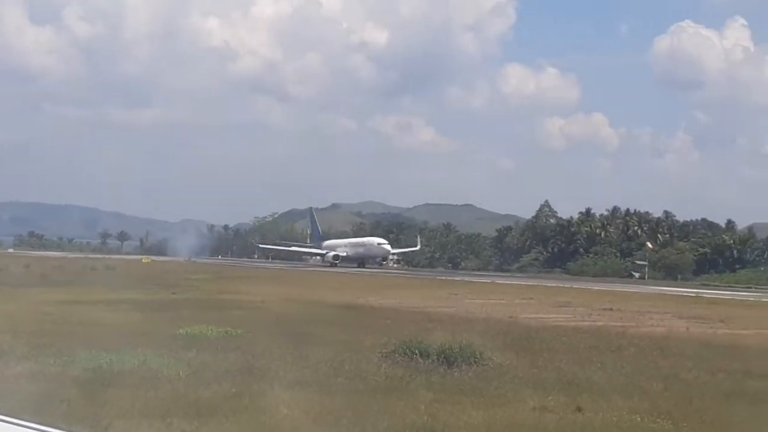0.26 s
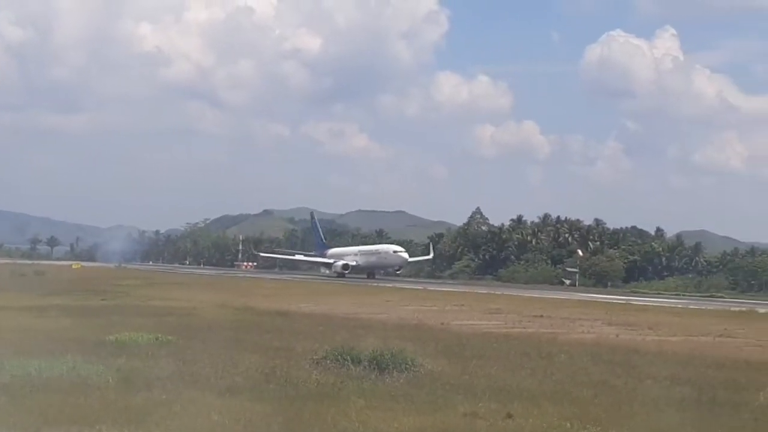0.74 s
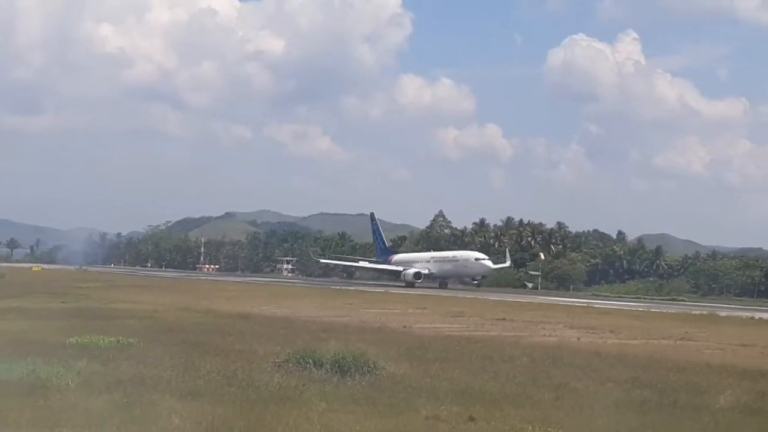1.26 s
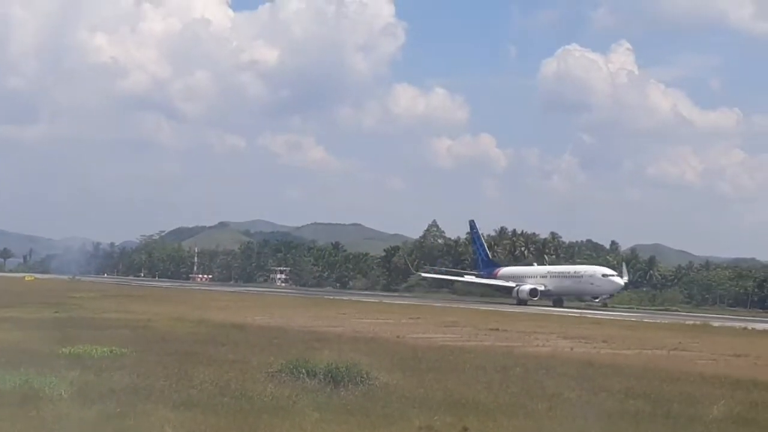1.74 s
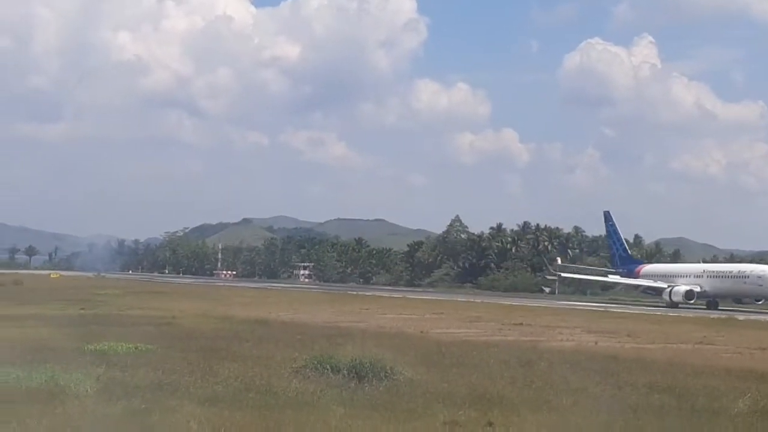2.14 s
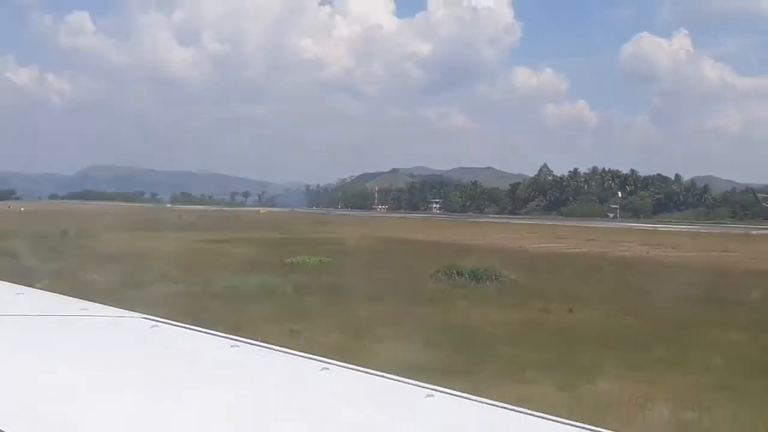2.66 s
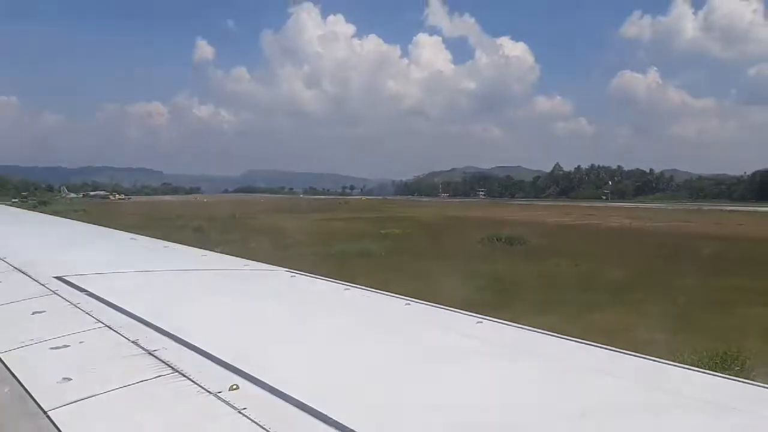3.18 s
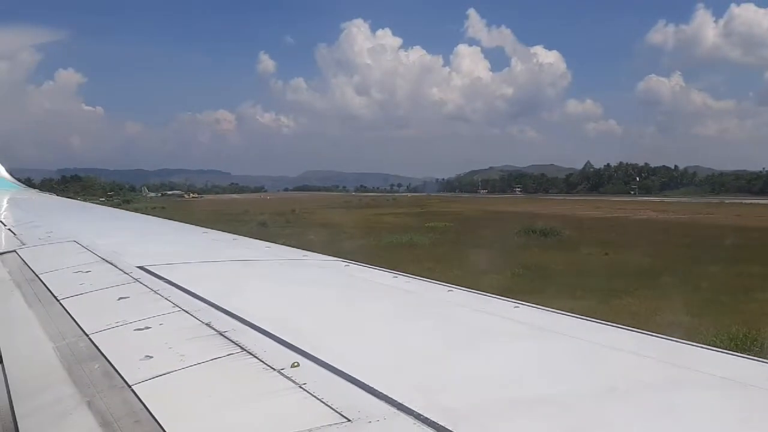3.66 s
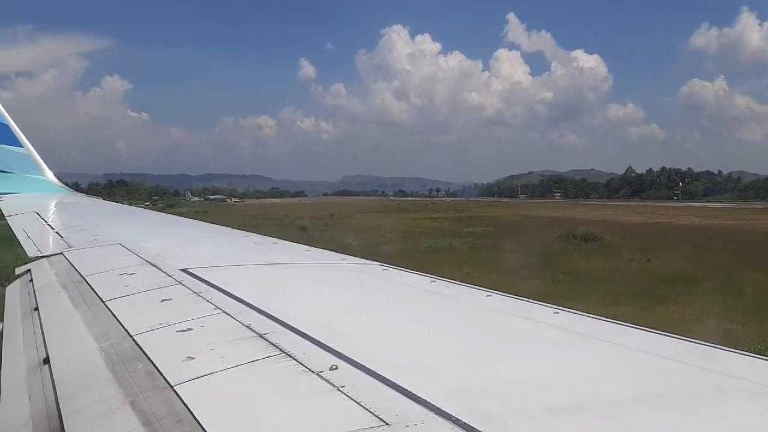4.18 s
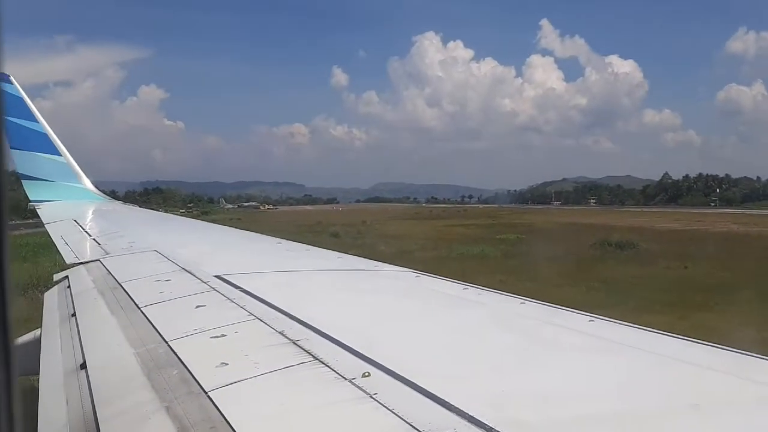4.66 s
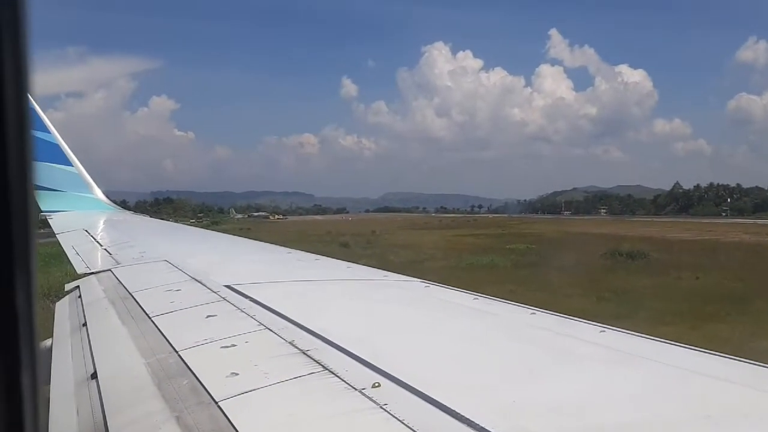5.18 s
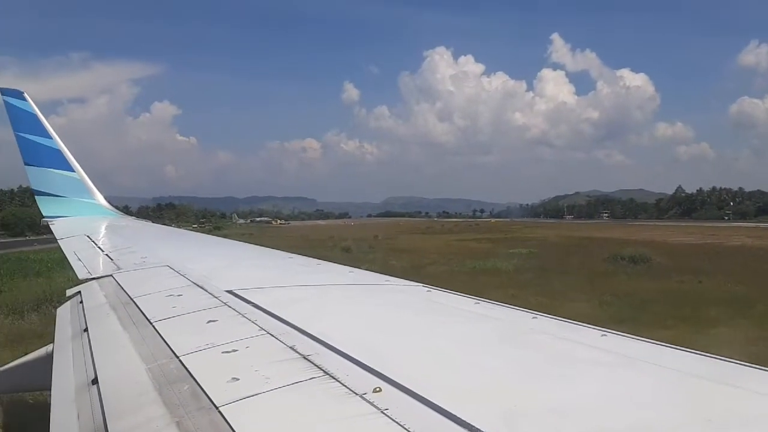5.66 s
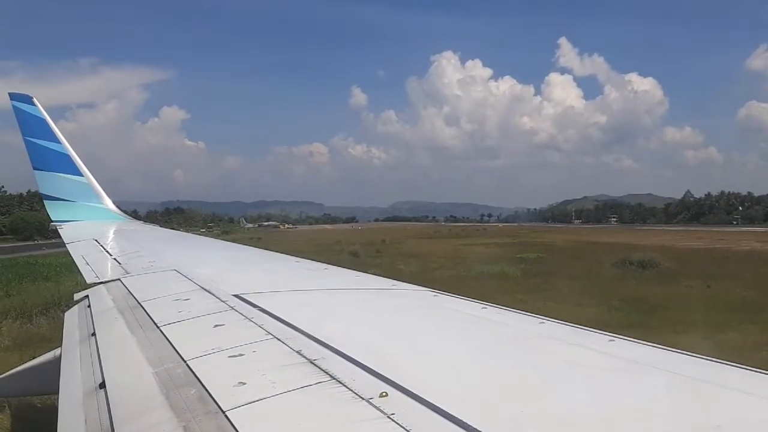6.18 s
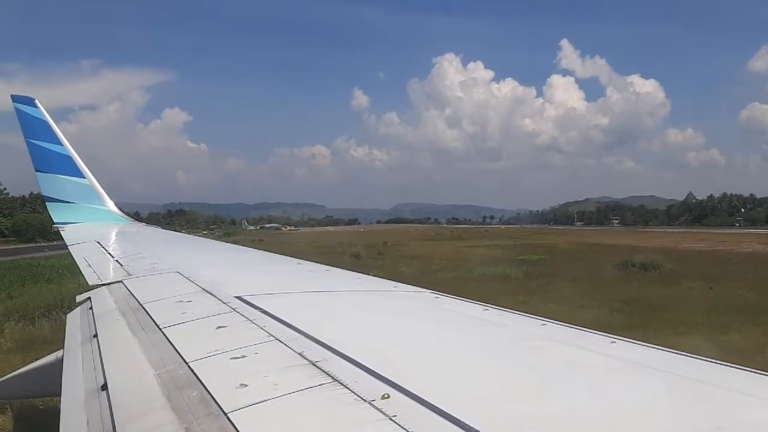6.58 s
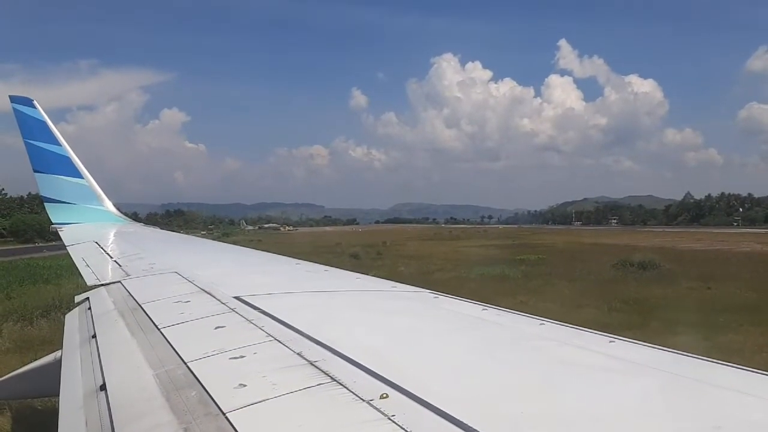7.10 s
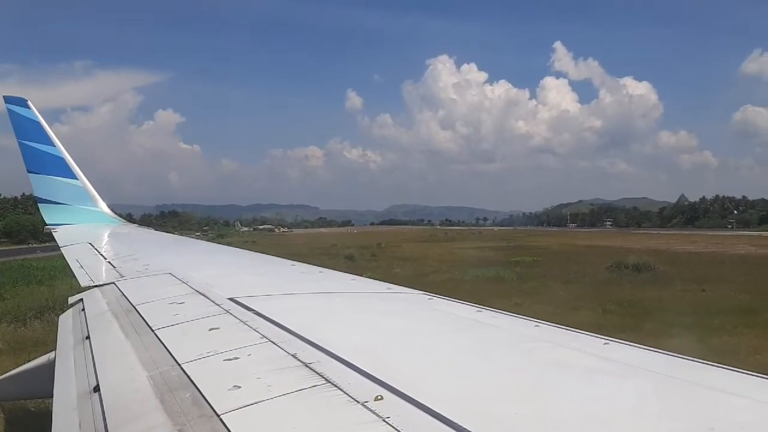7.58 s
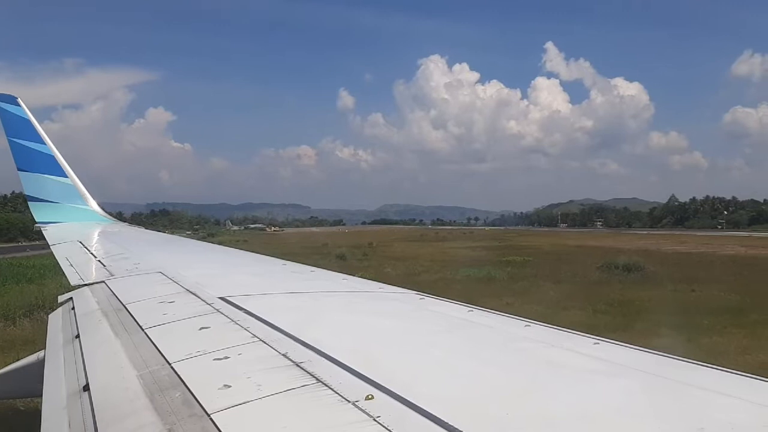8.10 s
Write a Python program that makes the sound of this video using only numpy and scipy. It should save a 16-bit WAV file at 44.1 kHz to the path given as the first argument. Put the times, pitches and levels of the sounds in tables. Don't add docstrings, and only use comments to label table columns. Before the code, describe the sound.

A window-seat cabin hum: idling engines rumble through the wall with steady tonal buzz, slow beating, faint fan whine and muted air hiss. A passing jet adds a smooth, dull low roar that rises and recedes without a sharp whoosh. Occasional dry handling clicks come from the handheld device. After seven and a half seconds, a hard cut brings overwhelming, slightly saturated low engine roar until the abrupt end.

```python
import sys
import numpy as np
from scipy import signal
from scipy.fft import rfft, irfft, next_fast_len
from scipy.io import wavfile
from scipy.ndimage import uniform_filter1d

SR = 44100
rng = np.random.default_rng(int(sys.argv[2]) if len(sys.argv) > 2 else 0)


def master(y):
    cut = np.clip(np.atleast_2d(y).T, -1, 1)
    pcm = np.round(cut * 32767)
    wavfile.write(sys.argv[1], SR, pcm.astype(np.int16))


def attenuation_scalar(level_db):
    decades = np.asarray(level_db, float) / 20
    return 10 ** decades


N = 367773

# freq_hz, density_db_per_hz
THRUST_MID = [(15, -62), (25, -27), (119, -3), (213, -8.5), (326, -11.5), (892, -41), (1260, -43.5),
              (1400, -44), (1870, -45), (2140, -47), (2640, -47.5), (5400, -54.5), (11600, -67.5),
              (12900, -67), (14000, -115)]
THRUST_SIDE = [(15, -59), (25, -29), (104, -8.5), (219, -5), (485, -12.5), (666, -16), (1050, -23.5),
               (1560, -23.5), (2940, -31), (5400, -35.5), (11000, -50), (12900, -54), (14000, -102)]
# freq_hz, density_db_per_hz
IDLE_MID = [(15, -80), (25, -37.5), (80, -7), (119, -3.5), (140, -4.5), (164, -2), (177, -9.5), (208, -4),
            (250, -8), (344, -7), (485, -22), (1400, -35), (4370, -44.5), (12300, -57.5), (14000, -86)]
IDLE_SIDE = [(15, -67), (25, -49), (122, -10), (147, -6.5), (309, -12.5), (344, -2), (525, -14.5),
             (684, -14), (1020, -16), (1100, -18.5), (2860, -27), (12600, -42), (14000, -76)]
# freq_hz, left_minus_right_db
THRUST_BALANCE = [(60, -1), (110, 1), (200, 2.5), (370, 2), (670, 3.5), (1230, 0.0), (2260, -0.5),
                  (4130, -5), (7560, -8.5), (13800, -7)]
IDLE_BALANCE = [(60, 2), (110, -0.5), (200, -0.5), (370, 1.5), (670, 2.5), (1230, 0), (2260, -4),
                (4130, -3), (7560, 1), (13800, -3)]
# freq_hz, width_hz,
# lift_db
THRUST_PANELS = [(131.8, 18, 7), (216, 24, 3), (278, 18, 0), (508, 88, -5.5), (677, 45, 4),
                 (3800, 500, 3.5), (7730, 440, 5.5), (11500, 500, 7.5)]
IDLE_PANELS = [(94.3, 11, 3.5), (341, 29, 0.5), (453.6, 27, 5), (686.5, 30, 8), (708, 26, -2),
               (1111, 320, -5), (1874, 36, -4), (2116, 250, 7.5), (2412, 130, 5.5), (2912, 100, 5),
               (3397, 130, 3.5), (4140, 500, 2.5), (6830, 670, 1), (7660, 300, 1.5), (11600, 990, 3)]
# centre_s, depth_db, half_length_s
LULLS = [
    (7.836, 17, 0.017),
    (7.972, 14, 0.026),
    (8.11, 5.5, .03),
    (8.261, 3.7, 0.043),
]
# multiple, left_db, right_db, left_lead_rad
BLADES = [(1, -54, -54, .5), (2, -60, -57, 1.)]
# multiple, left_db, right_db, left_lead_rad
SHAFT = [(1, -24, -25, -0.1), (2, -40, -43, 0.0), (3, -41, -47, -0.5), (4, -68, -53, -1.1),
         (5, -54, -57, -0.6)]
PUMP_PITCH_HZ = (346.55, 346.86)
# multiple, left_db, right_db, left_lead_rad
PUMP = [(1, -35, -38, -.3), (2, -50, -43, -2.1), (3, -44, -54, 2.2), (4, -65, -59, -2.0),
        (5, -56, -54, -1.1), (6, -61, -61, .8), (7, -59, -60, -.4), (8, -76, -63, 3.0), (9, -67, -66, .9)]
FAN_PITCH_HZ = (881.17, 885.28)
# multiple, left_db, right_db, left_lead_rad
FAN_A = [(1, -55, -62, -2.7), (2, -68, -61, -0.2), (3, -65, -58, 2.5), (4, -67, -63, -0.9),
         (5, -75, -69, 3.1)]
FAN_B = [(1, -52, -58, -0.8), (2, -68, -69, 0.3), (3, -61, -70, -0.7)]
# pitch_hz, left_db, right_db, left_lead_rad
GEARS = [(1348.1, -53, -54, -.1), (1366.8, -70, -59, 1.3), (4244.9, -66, -61, 2.6),
         (2188.6, -66, -65, -3.1)]
BLOWER_PITCH_HZ = (1440, 1452, 1465)
# multiple, left_db, right_db, left_lead_rad
BLOWER = [(1, -56, -52, 1.6), (2, -65, -60, -2.3)]
# freq_hz, density_db_per_hz
PASSING_COLOUR = [(30, -64), (60, -19), (95, -1), (140, -3), (220, 3.5), (260, -6), (330, -16.5),
                  (500, -15), (900, -51.5)]
# start_s, peak_db, centre_hz, length_s, top_end_db
CREAKS = [(0.481, -32.5, 5000, .016, -7), (.496, -38, 5500, 0.021, -9), (0.488, -38, 1900, 0.016, -30),
          (.485, -39.5, 4000, 0.025, -30), (4.8, -52, 6000, 0.095, 0), (1.55, -51, 5000, .03, -7),
          (4.55, -53, 6400, 0.22, -30), (4.799, -33, 5600, .008, -20), (4.81, -37, 5700, .007, -7),
          (5.791, -47, 6600, 0.028, -7), (5.792, -40, 4200, 0.017, -30), (6.25, -50, 6460, 0.01, -14),
          (7.76, -45, 6000, 0.021, -2)]
# edge_hz, gain_above_db
IDLE_SHELVES = [(4650, -3.5), (7200, -3.5), (8300, -3)]
THRUST_SHELVES = [(5750, -6), (8300, 2)]
# freq_hz, step_db
CAMERA_STEP = [(400, -20), (900, -3), (1300, 2), (2500, 4), (4500, 8.5), (7000, 8.5), (13000, 8.5)]

CUT_S, CUT_FADE_S = 7.5787, .000025
THRUST_DB, THRUST_SIDE_DB, IDLE_DB, IDLE_SIDE_DB = -8.5, -26.5, -21, -34
BOOM_SAG_DB_PER_S, RUMBLE_SAG_DB_PER_S = 4.5, 0.4
BLADE_HZ, SHAFT_HZ = 1842, 150.21
SHAFTS_IN_STEP_S, SHAFT_BEAT_S, SHAFT_BEAT_DEPTH = 3.9, 9, 0.49
PUMPS_IN_STEP_S = 1.55
PASSES_S, PASS_SPREAD_S, PASS_DB, EXHAUST_DB = 3.35, .55, -21.5, 1.5
WAKE_LATE_S, WAKE_SPREAD_S, WAKE_DB = 1.4, .8, 3.5
CREAK_HALF_WIDTH_HZ, CREAK_QUICK_S = 560, .006
CAMERA_TOP_HZ, FRAME_SAMPLES = 13100, 1024

T = np.arange(N) / SR
SIZE = next_fast_len(N)
HZ = np.maximum(np.arange(SIZE // 2 + 1) * SR / SIZE, 1.)


def level(x, db):
    return x * attenuation_scalar(db) / np.sqrt(np.mean(x ** 2))


def over_hz(rows):
    hz, value = np.transpose(rows)
    return np.interp(np.log(HZ), np.log(hz), value)


def walk(rate_hz):
    hold = int(SR / rate_hz)
    held = np.repeat(rng.standard_normal(N // hold + 1), hold)
    slewed = uniform_filter1d(uniform_filter1d(held, hold), hold)
    return 1.3 * slewed[:N]


def turbulence(colour, panels, db):
    gain = attenuation_scalar(over_hz(colour))
    for hz, width_hz, lift_db in panels:
        gain = gain * attenuation_scalar(lift_db / (1 + ((HZ - hz) / (width_hz / 2)) ** 2))
    noise = irfft(gain * rfft(rng.standard_normal(SIZE)), SIZE)
    return rfft(level(noise, db))


def cabin_noise(mid, side, balance, band_db, flicker_db):
    tilt = attenuation_scalar(over_hz(balance) / 2)
    pair = np.array([(mid + side) * tilt, (mid - side) / tilt])
    octave = np.clip(np.log2(HZ / 60), 0, 7)
    out = 0
    for k in range(8):
        share = np.clip(1 - abs(octave - k), 0, 1)
        band = irfft(pair * share, SIZE)[:, :N]
        out = out + band * attenuation_scalar(band_db(k) + flicker_db * walk(11))
    return out


def thrust():
    since_s = T - CUT_S
    lull_db = sum(db * np.exp(-((T - s) / half_s) ** 2) for s, db, half_s in LULLS)
    boom_db = 3.5 - BOOM_SAG_DB_PER_S * since_s - lull_db
    rumble_db = .3 - RUMBLE_SAG_DB_PER_S * since_s
    low_db = (boom_db, boom_db, rumble_db, 0.37 * rumble_db)

    def band_db(k):
        return low_db[k] if k < 4 else 0

    mid = turbulence(THRUST_MID, THRUST_PANELS, THRUST_DB)
    side = turbulence(THRUST_SIDE, THRUST_PANELS, THRUST_SIDE_DB)
    air = cabin_noise(mid, side, THRUST_BALANCE, band_db, 0.92)
    return air + tones(turning(BLADE_HZ, 0.001034, 6.6), BLADES)


def idle_air():
    rumble_db, hiss_db = -1.5 + 0.96 * walk(.9), .6
    wake_db = WAKE_DB * np.exp(-((T - PASSES_S - WAKE_LATE_S) / WAKE_SPREAD_S) ** 2)

    def band_db(k):
        return rumble_db + (k < 2) * wake_db if k < 3 else hiss_db

    lifts = [panel for panel in IDLE_PANELS if panel[2] > 0]
    mid = turbulence(IDLE_MID, IDLE_PANELS, IDLE_DB)
    side = turbulence(IDLE_SIDE, lifts, IDLE_SIDE_DB)
    return cabin_noise(mid, side, IDLE_BALANCE, band_db, 0.82)


def passing_db():
    along = (T - PASSES_S) / PASS_SPREAD_S
    return PASS_DB - 10 * np.log10(1 + along ** 2) + EXHAUST_DB * along / np.sqrt(1 + along ** 2)


def passing_jet():
    spectra = np.array([turbulence(PASSING_COLOUR, [], db) for db in (0, -19)])
    mid, side = irfft(spectra, SIZE)[:, :N]
    return np.array([mid + side, mid - side]) * attenuation_scalar(passing_db() + 1.2 * walk(4.64))


def tones(turns, rows):
    out = 0
    for multiple, left_db, right_db, lead_rad in rows:
        angle = 2 * np.pi * (multiple * turns + rng.random())
        left = attenuation_scalar(left_db) * np.sin(angle + lead_rad)
        right = attenuation_scalar(right_db) * np.sin(angle)
        out = out + np.sqrt(2) * np.array([left, right])
    return out


def turning(hz, wander=0., rate_hz=0.93):
    return np.cumsum(hz * (1 + wander * walk(rate_hz))) / SR


def engine_shafts():
    beat = 1 + SHAFT_BEAT_DEPTH * np.cos(2 * np.pi * (T - SHAFTS_IN_STEP_S) / SHAFT_BEAT_S)
    return tones(SHAFT_HZ * T, SHAFT) * np.sqrt(beat) * attenuation_scalar(-1.05 + 0.74 * walk(2.5))


def pumps():
    out = 0
    for row in PUMP:
        multiple = row[0]
        slip_hz = multiple * (PUMP_PITCH_HZ[1] - PUMP_PITCH_HZ[0])
        depth = .95 if multiple % 2 else .35
        beat = np.sqrt(1 + depth * np.cos(2 * np.pi * slip_hz * (T - PUMPS_IN_STEP_S)))
        out = out + beat * tones(np.mean(PUMP_PITCH_HZ) * T, [row])
    return out


def fans():
    fan_a = tones(turning(FAN_PITCH_HZ[0], .0001), FAN_A)
    return fan_a + tones(turning(FAN_PITCH_HZ[1], .0001), FAN_B)


def gears():
    return sum(tones(turning(hz, .0003, 3), [(1, *rest)]) for hz, *rest in GEARS)


def blowers():
    return sum(tones(turning(hz, .004, 10), BLOWER) * attenuation_scalar(3 * walk(14)) for hz in BLOWER_PITCH_HZ)


def machines():
    return engine_shafts() + attenuation_scalar(-1.2) * (pumps() + fans()) + attenuation_scalar(1.5) * gears() + attenuation_scalar(1.95) * blowers()


def idle():
    return idle_air() + passing_jet() + machines()


def creaks():
    out = np.zeros((2, N))
    size = 8192
    t = np.arange(size) / SR
    f = np.arange(size // 2 + 1) * SR / size
    ripple = 1 + 0.34 * np.cos(2 * np.pi * f / 2300)
    for s, db, hz, length_s, top_db in CREAKS:
        width_hz = CREAK_HALF_WIDTH_HZ * (1 + CREAK_QUICK_S / length_s)
        band = 1 / (1 + ((f - hz) / width_hz) ** 4)
        top = attenuation_scalar(top_db) * (hz / (f + hz)) * (f > hz) * (f < CAMERA_TOP_HZ) * ripple
        noise = irfft((band + top) * rfft(rng.standard_normal((3, size))))
        shape = (1 - np.exp(-t / (0.15 * length_s))) * np.exp(-(t / length_s) ** 2)
        start = int(s * SR)
        out[:, start:start + size] += level(noise[0] + .8 * noise[1:], db) * shape
    return out


def rounded(x):
    return np.tanh(.85 * x) / .85


def camera_rounding(x, shelves, patchy_db=1.5):
    size = FRAME_SAMPLES
    n, k = np.arange(2 * size) + .5, np.arange(size) + .5
    window = np.sin(np.pi * n / 2 / size)[:, None]
    basis = window * np.cos(np.pi / size * np.outer(n + size / 2, k)) * np.sqrt(2 / size)
    hz, count = k * SR / 2 / size, N // size + 3
    padded = np.pad([x[0] + x[1], x[0] - x[1]], ((0, 0), (size, count * size - N - size)), "reflect")
    halves = padded.reshape(2, count, size)
    z = np.concatenate([halves[:, :-1], halves[:, 1:]], axis=2) @ basis
    masking = np.sqrt(uniform_filter1d(z ** 2, size=41, axis=2)) + 1e-9
    patch = np.repeat(rng.standard_normal((2, count - 1, size // 16)), 16, axis=2)
    step = masking * attenuation_scalar(np.interp(hz, *np.transpose(CAMERA_STEP)) + patchy_db * patch)
    shelf_db = sum(db * (hz > edge_hz) for edge_hz, db in shelves)
    kept = step * np.round(z / step) * attenuation_scalar(shelf_db) * (hz < CAMERA_TOP_HZ)
    frames = kept @ basis.T
    lapped = frames[:, :-1, size:] + frames[:, 1:, :size]
    mid, side = lapped.reshape(2, -1)[:, :N] / 2
    return np.array([mid + side, mid - side])


def scene():
    cut = int(CUT_S * SR)
    before = camera_rounding(rounded(idle()), IDLE_SHELVES)
    after = camera_rounding(rounded(thrust()), THRUST_SHELVES)
    t = np.maximum(T - T[cut], 0)
    jump = before[:, cut:cut + 1] - .62 - after[:, cut:cut + 1]
    after = after + jump * np.cos(2 * np.pi * 125 * t) * np.exp(-t / 0.006)
    fade = 1 - np.exp(-t / CUT_FADE_S)
    return before + fade * (after - before) + creaks()


def top_cut(x):
    return signal.sosfilt(signal.butter(12, 14430, fs=SR, output="sos"), x)


def record(dry):
    closing = np.clip((T[-1] - T) / .004, 0, 1)
    limited = np.clip(dry, -1, 1) * closing
    low_pass = signal.ellip(6, .2, 50, 14200, fs=SR, output="sos")
    mix = signal.sosfilt(low_pass, limited)
    return top_cut(mix)


dry = scene()
out = record(dry)
master(out)
```